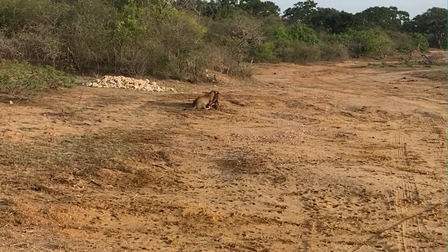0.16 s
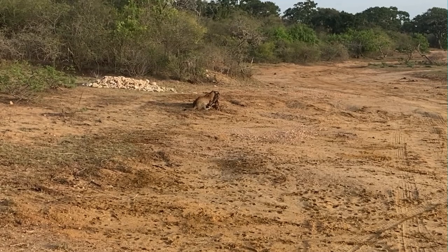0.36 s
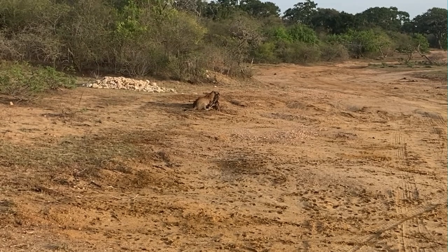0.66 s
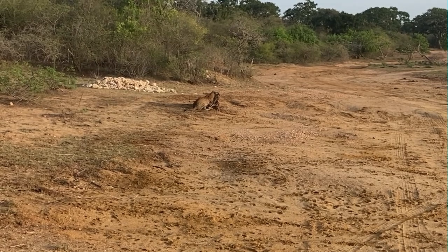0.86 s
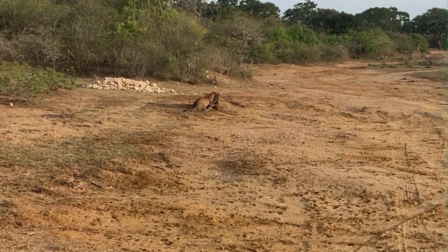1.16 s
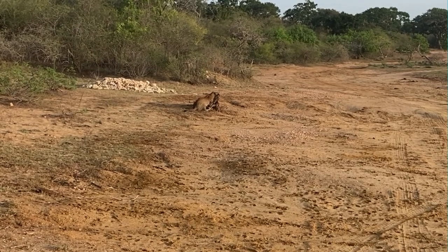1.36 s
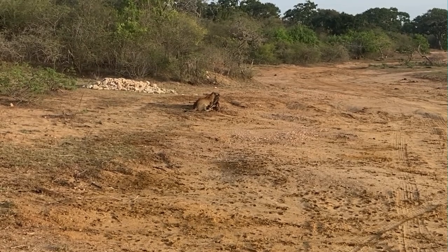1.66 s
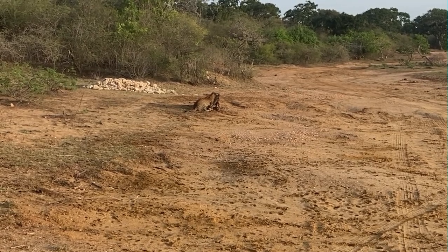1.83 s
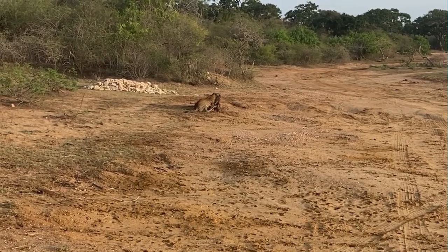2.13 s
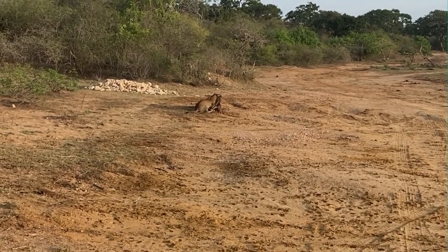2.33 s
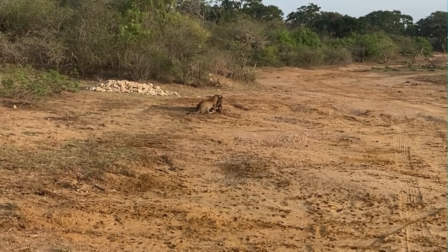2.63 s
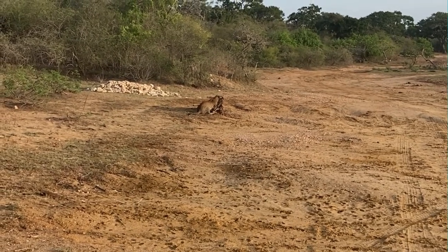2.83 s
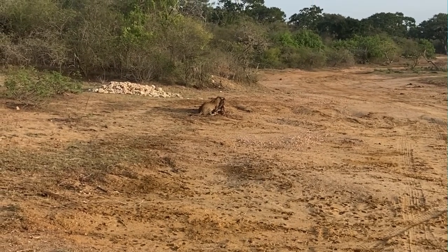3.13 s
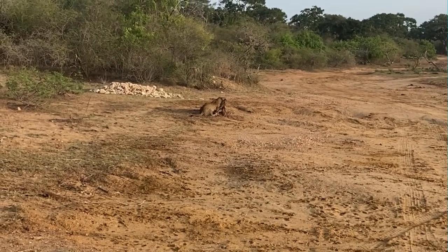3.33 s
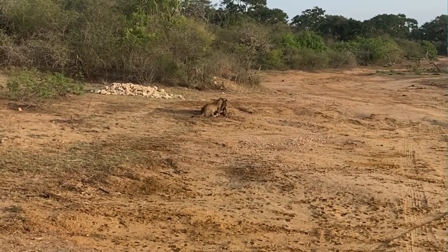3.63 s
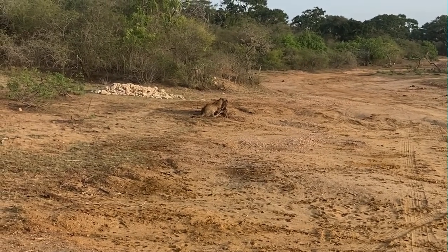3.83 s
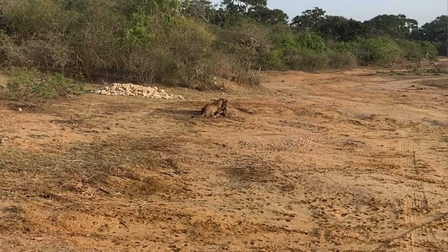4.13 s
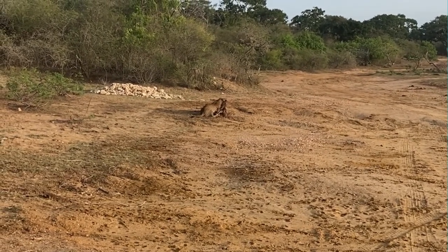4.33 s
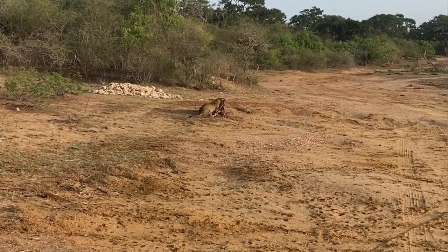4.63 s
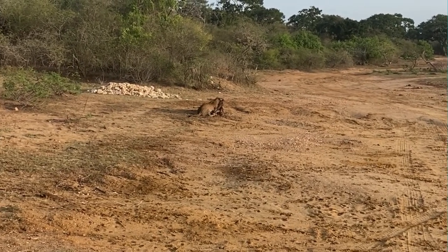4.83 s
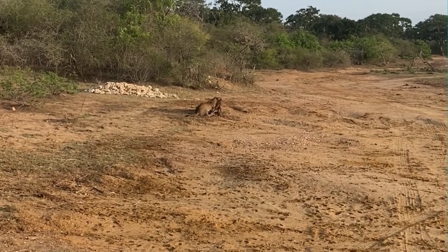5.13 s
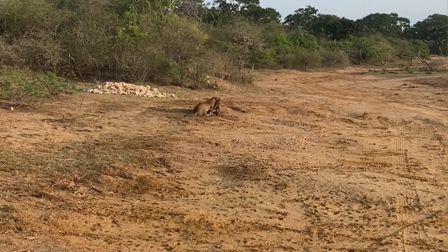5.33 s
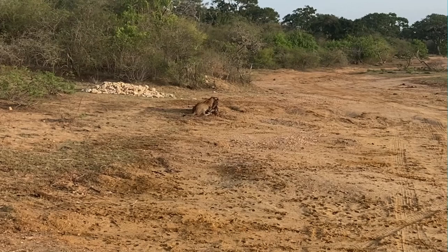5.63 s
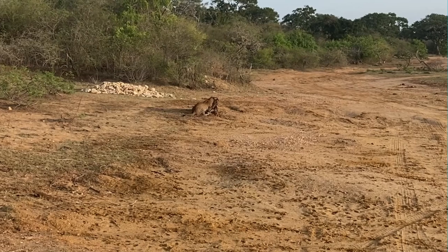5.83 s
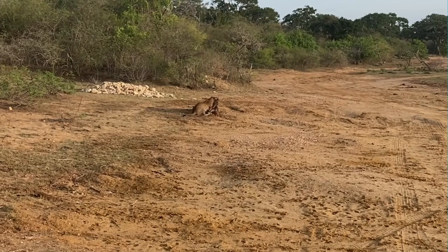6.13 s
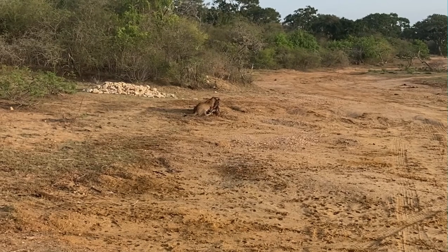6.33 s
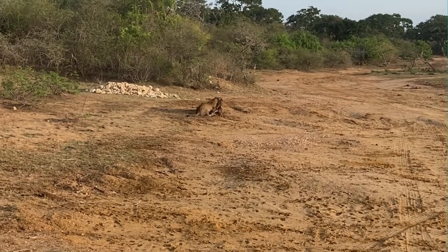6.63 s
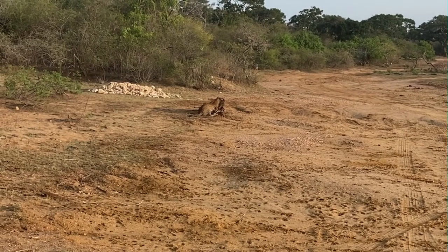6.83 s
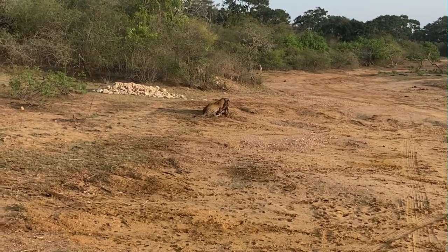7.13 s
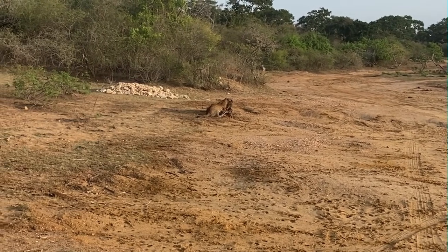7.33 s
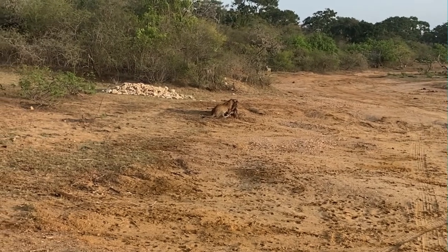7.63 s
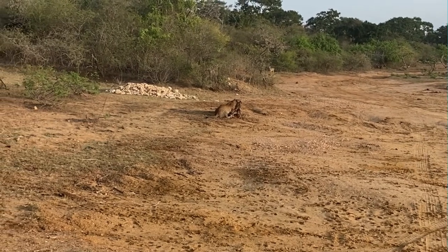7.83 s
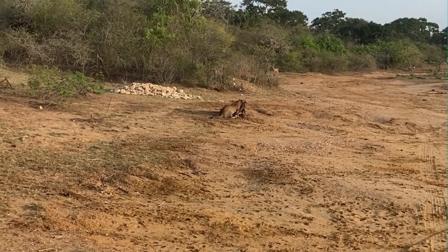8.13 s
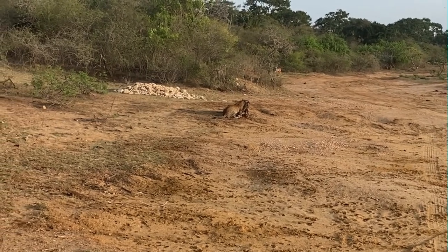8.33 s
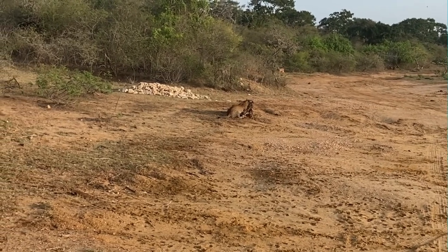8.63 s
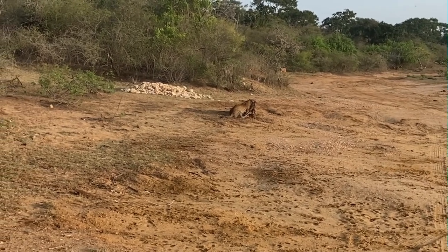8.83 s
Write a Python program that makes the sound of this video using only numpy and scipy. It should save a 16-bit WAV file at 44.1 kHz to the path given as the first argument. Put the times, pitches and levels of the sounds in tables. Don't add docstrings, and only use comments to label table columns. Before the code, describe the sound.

Distant birds whistle over a soft wind bed and an occasional dry leaf tick. Deer give short, piercing alarm yelps, about 1.2 kilohertz, that hold briefly then crack downward with an airy edge. Four come early; after a pause with twittering and slightly stronger wind buffeting, four more follow, mixed with tiny animal squeaks. Scattered tree echoes trail away, leaving birds and wind. Natural outdoor sound from a small stereo microphone.

```python
import sys
import numpy as np
from scipy import signal
from scipy.fft import rfft, irfft, next_fast_len
from scipy.io import wavfile
from scipy.ndimage import uniform_filter1d

SR = 44100
rng = np.random.default_rng(int(sys.argv[2]) if len(sys.argv) > 2 else 0)


def pcm_store(signal):
    levels = np.round(np.clip(np.atleast_2d(signal), -1, 1) * 32767)
    wavfile.write(sys.argv[1], SR, levels.astype(np.int16).T)


def convert_level_to_amplitude(level_db):
    exponent = np.asarray(level_db, float) / 20
    return 10 ** exponent


N = 395577

MOUTH_HZ, MOUTH_WIDTH_HZ = 974, 110

# start_s, break_after_s, end_after_s, top_pitch_hz, fundamental_db
BARKS = [
    (1.264, 0.13, .21, 1117, -44.5),
    (1.866, 0.15, .23, 1378, -25.5),
    (2.626, .13, .215, 1208, -35.5),
    (6.022, .13, 0.2, 1342, -22.5),
    (7.098, .2, 0.32, 1281, -24.5),
    (2.765, .14, .25, 1272, -28.5),
    (7.305, .112, .22, 1175, -43),
    (7.595, .09, 0.12, 1180, -54.5),
]
# second_partial_db, air_db, fade_while_held_db, sag_while_held_hz, tumble_hz_per_s
VOICES = [(-3, -6.5, 3, 49, 4800), (-9, -18.5, 3.5, 60, 7000), (-4.5, -8.5, 0, 70, 6400),
          (-11, -27, -1, 49, 6000), (-8, -23, -4.5, 130, 3500), (-5, -21, 0, 90, 5300),
          (-3, -9, 5.5, 65, 4600), (2.5, -17, -4, 10, 3500)]
HOARSENESS = [.05, .04, .18, .04, .05, .05, .25, .25]
# half_pitch_lines_db, nasal_band_db, top_hiss_db, upper_partials_db
BARK_COLOURS = [(-43.5, 13.5, -5, -10.5), (-34.5, 13.5, -14, -7.5), (-30, 11.5, 9, -3),
                (-30.5, 10, -8.5, -1), (-22.5, 22.5, 6, -6), (-21, 19.5, -4.5, -4.5), (-29, 16, 6.5, -4),
                (-8, 38.5, 1, -5)]
# pitch_hz, level_db
THROAT = [(1700, -30), (2900, -17), (3700, -15), (4400, -20), (5300, -20), (5950, -17), (6800, -12),
          (8100, 0), (8800, -9), (9700, -7), (11000, -15), (12300, -26), (14500, -20), (15600, -22)]
# time_s, half_length_s, level_db
CATCHES = [(1.405, 0.0023, -13), (1.881, 0.0026, -9), (1.894, 0.0023, -22.5), (2.868, 0.0069, -15),
           (2.917, 0.0063, -14), (6.036, 0.0034, -15), (6.054, 0.0071, -5), (7.118, 0.0059, -7),
           (7.312, 0.003, -5), (2.827, 0.005, -11)]
# fundamental_db, fundamental_radians, second_partial_db, second_partial_radians
LEFT_PORT = [(-12, -.1, 1, -1.5), (-6, -.2, -18, 0), (-3, 1.5, -5, -1.5), (-5, -.1, -24, 1.2),
             (-7, .9, -7, -1.7), (-8, 1.1, -6, -1.4), (-2, -2, -2, -1.9), (-2, -1, -2, -1.6)]


def deer():
    out = np.zeros((2, N))
    mouth_lifts_db = [2, 1, 12, 2.2, 2.8, 5.8, 11.3, 0.5]
    herd = zip(BARKS, VOICES, mouth_lifts_db, HOARSENESS, BARK_COLOURS, LEFT_PORT)
    for (s, *call), voice, mouth_db, hoarse, (half_db, nose_db, top_db, upper_db), port in herd:
        hz, db1, db2, air_db, ends = bark(*call, *voice)
        n = len(hz)

        def throat(f):
            return convert_level_to_amplitude(read(THROAT, f) + nose_db * (f < 5900) + top_db * (f > 11300))

        fallen = np.clip(5 * (1 - hz / hz.max()), 0, 1)
        jitter = .002 + .04 * hoarse + (.015 + .08 * hoarse) * fallen
        phase = 2 * np.pi * np.cumsum(hz * (1 + jitter * band(0, 140, n))) / SR

        def shake(depth):
            return 1 + depth * hoarse * band(0, 900, n) + (.6 + hoarse) * fallen * band(0, 240, n)

        tumbling = np.gradient(hz) * SR < -3000
        broken = uniform_filter1d(np.maximum.accumulate(1. * tumbling), size=200)
        mouth = mouth_db * near_mouth(hz) * broken
        t = s + np.arange(n) / SR
        catch = sum(db * np.exp(-((t - at) / half_s) ** 4) for at, half_s, db in CATCHES)

        low = convert_level_to_amplitude(db1 - 9 * broken + mouth + catch) * partial(1, hz, phase, *port[:2]) * shake(0.78)
        high = -convert_level_to_amplitude(db2 + 0.35 * mouth + 0.87 * catch) * partial(2, hz, phase, *port[2:]) * shake(2.6)
        half_lines = np.sin(1.5 * phase) + np.sin(2.5 * phase) / 2
        half = convert_level_to_amplitude(db1 + half_db) * half_lines * band(0, 80, n)
        upper = 0
        for k in range(3, 12):
            flicker = convert_level_to_amplitude(6.46 * band(0, 50, n))
            upper = upper + throat(k * hz) * flicker * np.sin(k * phase) * shake(6.5)

        notches = np.cumsum(rng.standard_normal(80))
        notches -= uniform_filter1d(notches, size=7)
        air = coloured(lambda f: throat(f) * convert_level_to_amplitude(5 * np.interp(f / 200, np.arange(80), notches)), n)
        air = air * .8 * (1 + .5 * np.sin(phase))
        top = convert_level_to_amplitude(air_db) * (convert_level_to_amplitude(upper_db) * (1 - fallen / 2) * upper + air)
        add(out, int(s * SR), ends * (low + high + half + top))
    return out


def bark(break_s, end_s, top_hz, db, second_db, air_db, fade_db, sag_hz, tumble_hz):
    t, ends = clock(end_s, 0.0065)
    held, after = np.clip(t / break_s, 0, 1), np.clip(t - break_s, 0, None)
    scoop = 1 - .13 * np.exp(-t / 0.014)
    hz = top_hz * scoop - sag_hz * held ** 2.8 - tumble_hz * after
    hz += .6 * (MOUTH_HZ - hz) * near_mouth(hz) * (after > 0)
    hz = uniform_filter1d(np.maximum(hz, 570), size=400)
    start_db, attack_s = -56.5, 0.044
    effort = db + (start_db - db) * np.clip(1 - t / attack_s, 0, 1) ** 2 + fade_db * held ** 2
    loss = np.outer((-12, -25, -18.5), (after / (end_s - break_s)) ** 1.23)
    air = air_db - 5 * (2 * held - 1) ** 2
    return hz, effort + loss[0], effort + second_db + loss[1], effort + air + loss[2], ends


def near_mouth(hz):
    return np.exp(-((hz - MOUTH_HZ) / MOUTH_WIDTH_HZ) ** 2)


def partial(k, hz, phase, left_db, left_rad):
    scale = 2 * np.sqrt(2) / abs(1 + convert_level_to_amplitude(left_db) * np.exp(1j * left_rad))
    lag_samples = 5
    lead = left_rad + 2 * np.pi * k * hz * lag_samples / SR
    return scale * np.array([convert_level_to_amplitude(left_db) * np.cos(k * phase + lead), np.cos(k * phase)])


# start_s, length_s, pitch_hz, level_db, scoop_share_of_pitch
SQUEAKS = [
    (2.452, 0.066, 1130, -64.5, 0.014),
    (5.467, 0.055, 1145, -66, 0.0087),
    (5.789, 0.059, 1166, -64.5, 0.0086),
    (6.463, 0.049, 1192, -60, 0.014),
    (6.819, 0.049, 1197, -58.5, 0.012),
    (7.789, 0.11, 1012, -66, 0.0064),
    (7.892, 0.089, 1134, -61.5, .2),
]
SQUEAK_HALF_LINES = [-20, -33, -50, -28, -23, -22, -17.5]
SQUEAK_TILTS = [-.5, 0, -1.5, 0, -0.5, -10, -2]


def squeaker():
    out = np.zeros(N)
    for (s, length, top_hz, db, scoop), half_db, tilt_db in zip(SQUEAKS, SQUEAK_HALF_LINES, SQUEAK_TILTS):
        t, ends = clock(length, 0.0017)
        n, u = len(t), t / length
        hz = top_hz * (1 - scoop * (1 - u) ** 2.5 - .16 * u ** 3.4)
        phase = 2 * np.pi * np.cumsum(hz * (1 + .008 * band(0, 220, n))) / SR
        arch = -20 * (2 * u ** 0.82 - 1) ** 2
        dbs = [db + partial_db + tilt_db * max(k - 1, 0) + arch
               for k, partial_db in enumerate((-10.5, -1, -1.5, -12))]
        dbs += [dbs[-1] - 20 - 1.1 * k for k in range(8)]
        stack = 0
        for k, level_db in enumerate(dbs):
            rough = 1 + 0.55 * band(0, 330, n)
            stack = stack + convert_level_to_amplitude(level_db + 17.5) * np.sin((k + 1) * phase) * rough
        air = convert_level_to_amplitude(dbs[1] - 18) * band(4700, 9000, n)
        uneven_pulses = 1 + 2 * convert_level_to_amplitude(half_db) * np.cos(phase / 2)
        add(out, int(s * SR), ends * (air + stack * uneven_pulses))
    return out


def birds():
    out = np.zeros(N)
    for s, length, start_hz, middle_hz, end_hz, db in notes() + twitter():
        u = np.linspace(0, 1, int(length * SR))
        hz = np.polyval(np.polyfit([0, .5, 1], [start_hz, middle_hz, end_hz], 2), u)
        swell = np.sin(np.pi * u ** .6) ** .75
        flutter = 1 + .45 * band(0, 200, len(u))
        add(out, int(s * SR), convert_level_to_amplitude(db + 8.5) * swell * flutter * np.sin(2 * np.pi * np.cumsum(hz) / SR))
    return out


# share_of_song_length, note_s, start_hz, middle_hz, end_hz
SONG = [
    (0, .028, 7200, 7000, 6850),
    (.165, .04, 7250, 7700, 7550),
    (.39, .03, 7000, 7600, 7400),
    (.67, 0.03, 7350, 7100, 6900),
    (1.001, 0.02, 6700, 6150, 5810),
]
# start_s, length_s, level_db
SONGS = [(0.886, 0.2, -63.5), (4.867, 0.2, -63.5), (8.579, .198, -60)]
# start_s, length_s, middle_hz, level_db
CHIPS = [(4.075, 0.017, 1730, -67), (4.203, .025, 4200, -77), (4.412, 0.031, 3900, -75),
         (4.771, 0.026, 3020, -61.5), (4.945, 0.019, 3060, -58.5), (5.227, 0.06, 3350, -58.5),
         (5.325, 0.051, 2850, -62.5), (8.071, 0.045, 3370, -71.5), (8.344, 0.034, 3130, -66),
         (8.494, 0.051, 4320, -74.5), (8.582, 0.031, 3560, -65), (8.671, .02, 4720, -78),
         (8.862, 0.031, 3570, -66.5), (3.161, 0.1, 605, -69.5)]
# start_s, length_s, start_hz, end_hz, level_db
WHISTLES = [(0, 0.034, 5700, 5250, -57.5), (1.1, 0.036, 2550, 2650, -68.5),
            (0.57, 0.046, 2200, 3900, -61.5), (.513, 0.062, 4700, 4150, -76),
            (.584, 0.21, 3950, 3950, -73.5), (1.2, 0.032, 3400, 3350, -61.5), (1.07, 0.1, 4030, 3870, -63),
            (1.3, 0.095, 4320, 4150, -61.5), (5, 0.053, 4700, 4600, -71), (1.3, 0.076, 3140, 3500, -65.5),
            (2.223, 0.35, 820, 818, -71), (2.218, 0.14, 555, 525, -68), (2.469, 0.2, 4100, 5170, -64),
            (1.5, .022, 2900, 2800, -63.5), (3.915, .05, 4600, 4250, -73), (5.573, .12, 4400, 4250, -71),
            (4.97, .062, 4080, 3800, -67), (5.5, 0.061, 4000, 3800, -61), (6, 0.045, 3600, 3400, -57.5),
            (6.5, .11, 3300, 2980, -62.5), (8, 0.09, 2990, 3100, -66), (8.195, 0.123, 2770, 2650, -69.5),
            (8.37, 0.015, 2900, 3960, -66), (8.788, 0.1, 2700, 2600, -75)]
# start_s, length_s, start_hz, level_db
DIVES = [(0.171, 0.13, 6540, -69.5), (3.596, .1, 6520, -68.5), (8.13, 0.13, 6540, -74)]
# start_s, length_s, top_hz, level_db
LOOPS = [(8.322, .085, 7010, -74), (8.533, 0.06, 7930, -76)]


def notes():
    song, overtones = [], []
    for s, span, db in SONGS:
        for k, ((share, n, a, b, c), up_db) in enumerate(zip(SONG, (-2.5, -3, -3.5, 3, 0))):
            at = s + share * span
            song.append((at, n, a, b, c, db + up_db))
            if 0 < k < 4:
                overtones.append((at, n, 1.5 * a, 1.5 * b, 1.5 * c, db + up_db - 19.5))
    chips = [(s, n, hz * 1.29, hz, hz * .71, db) for s, n, hz, db in CHIPS]
    whistles = [(s, n, a, (a + c) / 2 * 1.013, c, db) for s, n, a, c, db in WHISTLES]
    dives = [(s, n, hz, .98 * hz, .86 * hz, db) for s, n, hz, db in DIVES]
    loops = [(s, n, .88 * hz, hz, .68 * hz, db) for s, n, hz, db in LOOPS]
    return song + overtones + chips + whistles + dives + loops


def twitter(count=170):
    when, length, pitch, bend, up = rng.random((count, 5)).T
    hz = np.interp(pitch ** 1.5, (0, 1), (2300, 5000))
    glide = .12 * (2 * bend - .6)
    db = -79 + 4 * (2 * up - 1)
    length_s = .07 * (0.29 + 0.28 * length)
    return list(zip(when * (N / SR - .1), length_s, hz * (1 + glide), hz, hz * (1 - glide), db))


# delay_s, level_db
TREE_LINES = [(0.329, -61.5), (0.639, -46), (.98, -52.5)]


def trees(x, likeness=.7):
    t = np.arange(int(1.6 * SR)) / SR

    def tail(db, t60_s):
        return convert_level_to_amplitude(db - 60 * t / t60_s) * np.sqrt(2 * np.log(1000) / t60_s / SR)

    shape = tail(-16, .35) + tail(-23, 1.4) * convert_level_to_amplitude(1.5 * band(0, 30, len(t)))
    smear_s = .035
    for s, db in TREE_LINES:
        shape = shape + convert_level_to_amplitude(db) * np.exp(-((t - s) / smear_s) ** 2) / np.sqrt(smear_s * SR)
    shape = shape * (1 - np.exp(-t / .07))
    shared, left, right = (coloured(lambda f: 1 / (1 + (f / 6000) ** 2.5), len(t)) for _ in range(3))
    own = np.sqrt(1 - likeness ** 2)
    return np.array([signal.fftconvolve(x, shape * (likeness * shared + own * side))[:N]
                     for side in (left, right)])


# start_s, length_s, centre_hz, width_hz, level_db
RUSTLES = [
    (0.146, 0.022, 5500, 7200, -65.5),
    (0.612, 0.049, 4660, 1500, -71),
    (0.958, 0.049, 4150, 1480, -69),
    (2.342, 0.023, 6200, 3700, -57.5),
    (3.367, 0.47, 7690, 5000, -73),
    (3.415, .34, 12700, 3140, -81.5),
    (4.287, 0.05, 7400, 6000, -76),
    (4.736, 0.046, 4000, 2450, -68),
    (8.137, 0.46, 8950, 4020, -84.5),
    (0, 0.34, 1146, 251, -69.5),
]


def leaves():
    out = np.zeros(N)
    for s, length, hz, width_hz, db in RUSTLES:
        n = int(length * SR)
        swell = np.sin(np.linspace(0, np.pi, n)) ** 0.44
        add(out, int(s * SR), convert_level_to_amplitude(db) * swell * band(hz, width_hz, n))
    return out


# pitch_hz, level_db per Hz
WIND = [(13, -45), (22, -24), (54, 6.5), (89, 2), (203, -6), (372, -19.5), (517, -33), (718, -38.5),
        (1180, -47), (2540, -48.5), (5040, -60.5), (5790, -62), (8730, -73.5), (11500, -69.5),
        (15500, -93.5)]
# time_s, level_db
GUSTS = [(0.0, -50), (2.8, -48), (3.3, -47.5), (5.5, -48), (5.7, -54), (6.8, -50.5), (8.97, -54)]
# time_s, level_db
BUFFETS = [(0, -66), (5.2, -66), (5.3, -50), (5.95, -48), (6.2, -53), (7, -49), (7.6, -53), (7.95, -67),
           (8.97, -68)]


def wind():
    t = np.arange(N) / SR

    def low(f):
        return 1 / (1 + (f / 450) ** 4)

    rumble = [coloured(lambda f: convert_level_to_amplitude(read(WIND, f)) * low(f) * (f > 20), N) for _ in range(3)]
    out = convert_level_to_amplitude(np.interp(t, *np.transpose(GUSTS))) * (rumble[0] + .15 * np.array(rumble[1:]))
    push = coloured(lambda f: (f / 50) ** 1.5 / (1 + (f / 62) ** 3.9), N) * convert_level_to_amplitude(3 * walk(16))
    out += convert_level_to_amplitude(np.interp(t, *np.transpose(BUFFETS))) * push * np.array([[1], [-1]])

    n = next_fast_len(N)
    f = np.arange(n // 2 + 1) * SR / n
    hiss = [rfft(coloured(lambda f: convert_level_to_amplitude(read(WIND, f)) * (1 - low(f)), n)) for _ in range(3)]
    hiss = hiss[0] + np.clip(f / 1100, .2, 1.3) * np.array(hiss[1:])
    swell = walk(5) + 1.8 * walk(30)
    for octave in np.arange(8, 14.5, .5):
        share = np.cos(np.pi * np.clip(np.log2(f + 1) - octave, -.5, .5)) ** 2
        patchy_db = .5 * (octave - 7) * (.5 * swell + .8 * walk(6) + .8 * walk(45))
        out += convert_level_to_amplitude(-65 + patchy_db) * irfft(hiss * share, n)[:, :N]
    return out


def read(table, hz):
    f, db = np.transpose(table)
    return np.interp(np.log(np.maximum(hz, 1)), np.log(f), db)


def coloured(gain, size):
    n = next_fast_len(size)
    spectrum = rfft(rng.standard_normal(n)) * gain(np.arange(n // 2 + 1) * SR / n)
    x = irfft(spectrum, n)[:size]
    return x / np.std(x)


def band(hz, width_hz, size):
    return coloured(lambda f: np.exp(-((f - hz) / (width_hz / 2)) ** 2), size)


def walk(hz):
    points = N // 64 + 2
    return np.interp(np.arange(N) / 64, np.arange(points), band(0, 64 * hz, points))


def clock(length, fade_s):
    t = np.arange(int(length * SR)) / SR
    return t, np.clip(np.minimum(t, length - t) / fade_s, 0, 1)


def add(out, start, x):
    out[..., start:start + x.shape[-1]] += x[..., :N - start]


# pitch_hz, phase_radians
PORT_PHASE = [(3000, -2.14), (3700, -3.1), (4500, -4.4), (5800, -3.1), (8000, -.5), (9600, .9),
              (11100, 3.1), (14300, 6.2), (16000, 6.6)]


def scene():
    herd, squeaks, songs = deer(), squeaker(), birds()
    far = trees(herd.mean(axis=0) + convert_level_to_amplitude(-2) * squeaks + convert_level_to_amplitude(3) * songs)
    far *= 1 + .28 * walk(220)
    left, right = herd + squeaks + songs + far + leaves() + wind()
    n = next_fast_len(N)
    f = np.arange(n // 2 + 1) * SR / n
    turn = np.interp(f, *np.transpose([(0, 0.007)] + list(PORT_PHASE)))
    return np.array([irfft(rfft(left, n) * np.exp(1j * turn), n)[:N], right])


def band_limit(x):
    return signal.sosfilt(signal.butter(12, 15690, fs=SR, output="sos"), x)


def record(dry):
    return band_limit(dry)


dry = scene()
out = record(dry)
pcm_store(out)
```